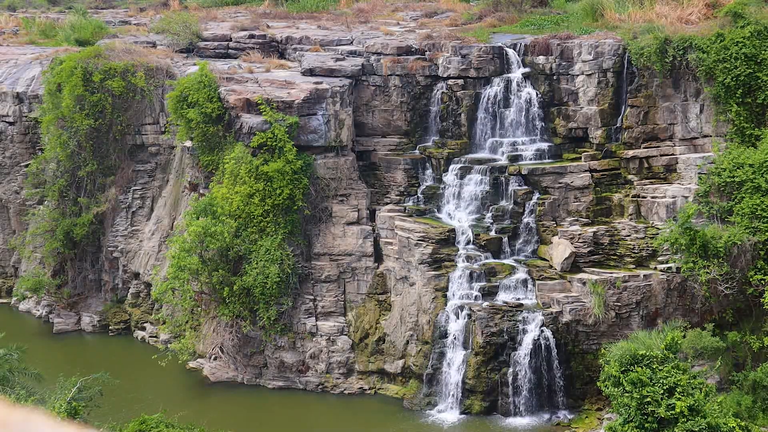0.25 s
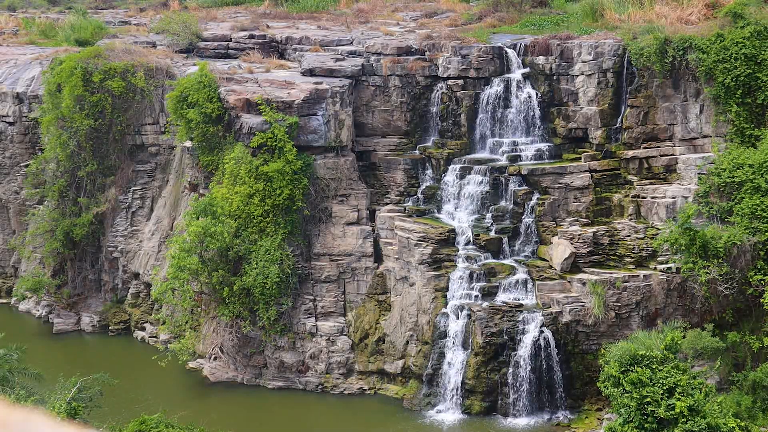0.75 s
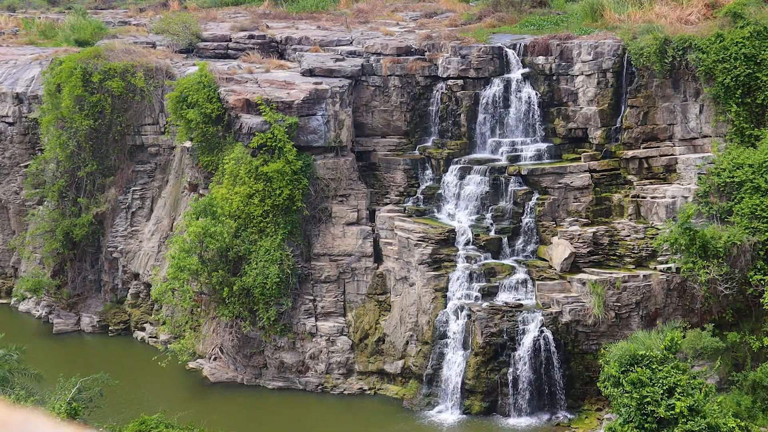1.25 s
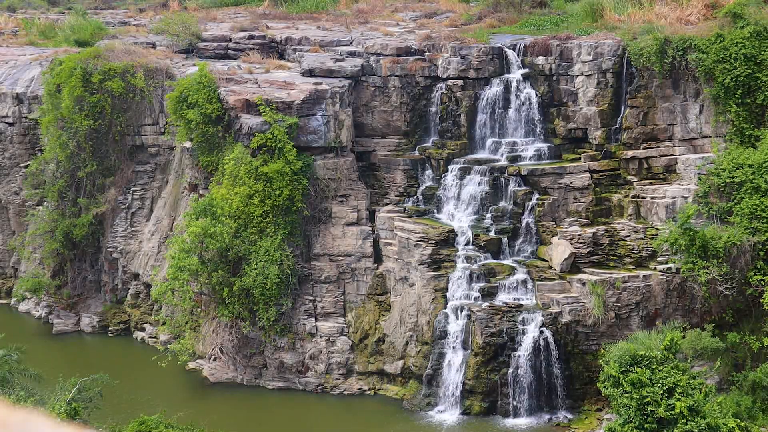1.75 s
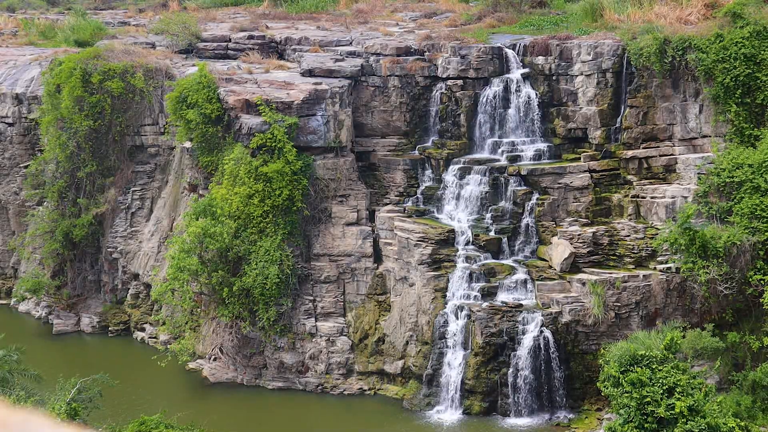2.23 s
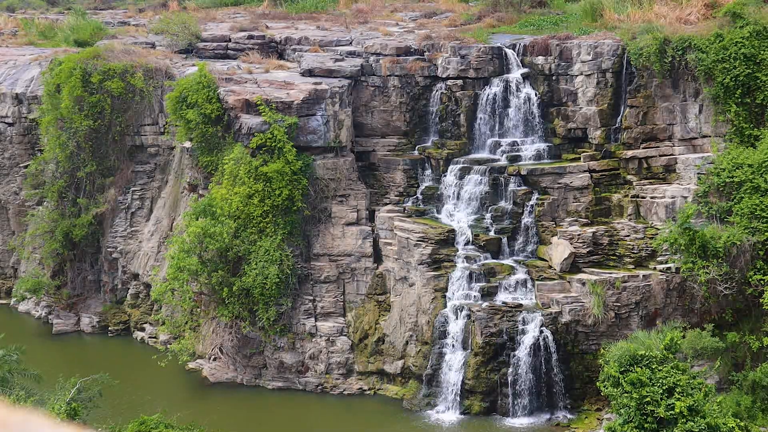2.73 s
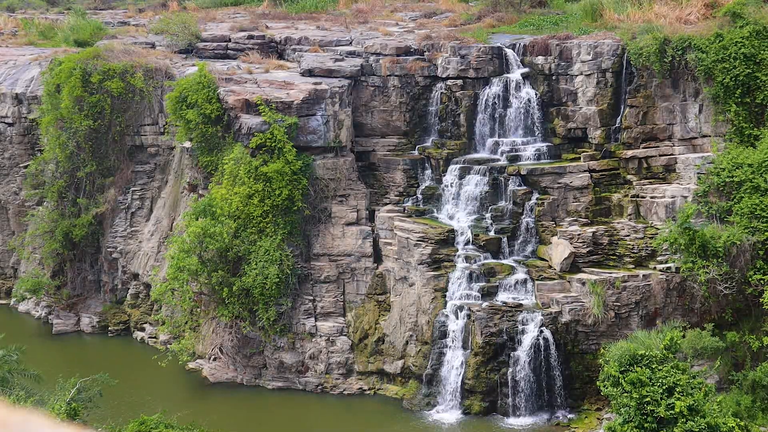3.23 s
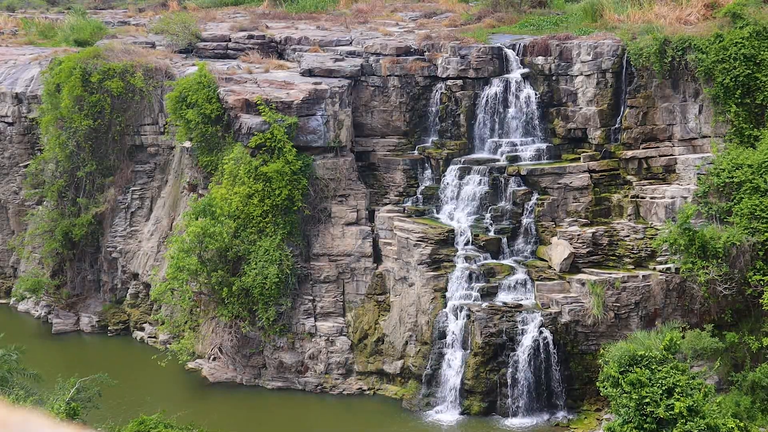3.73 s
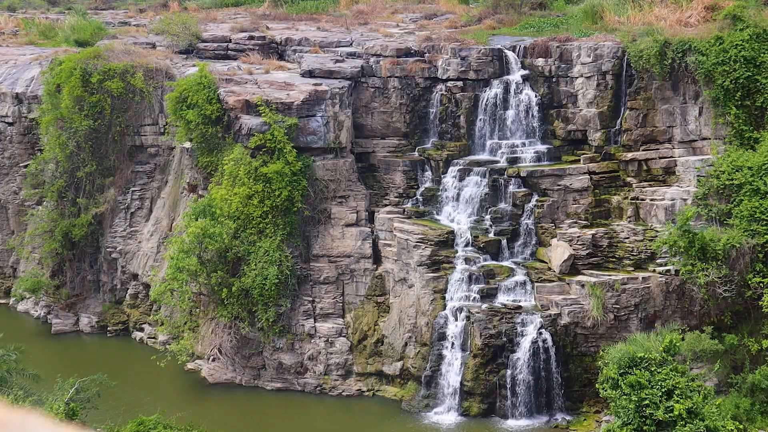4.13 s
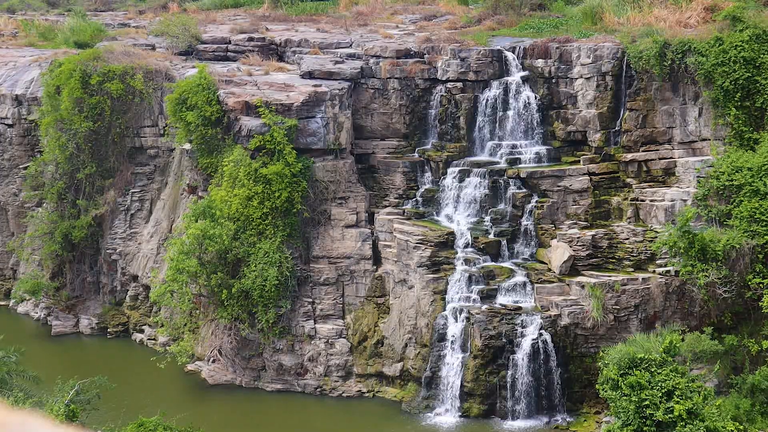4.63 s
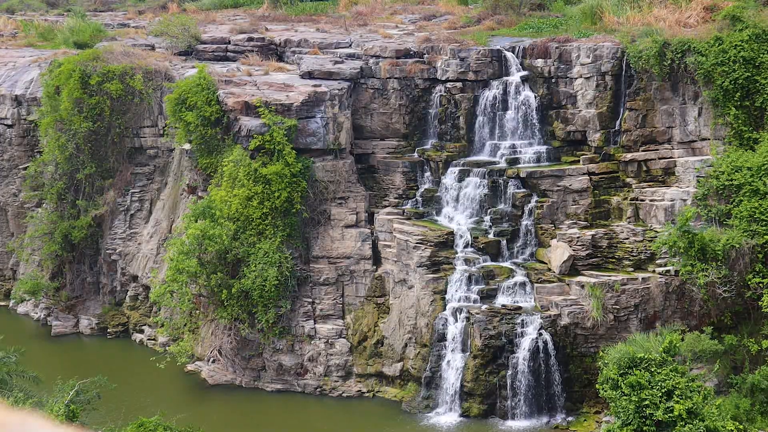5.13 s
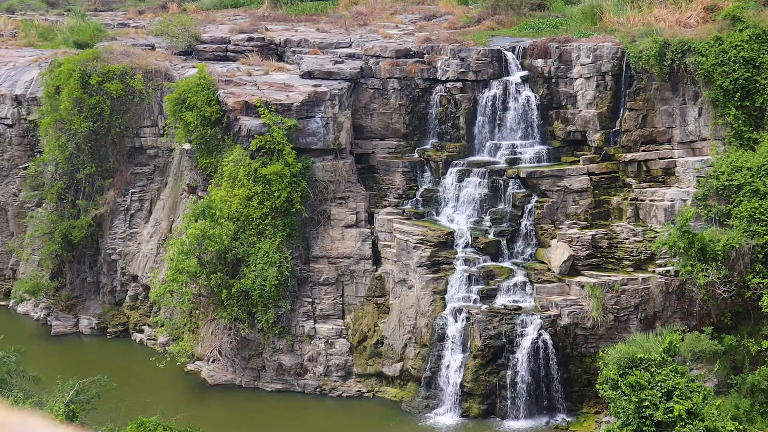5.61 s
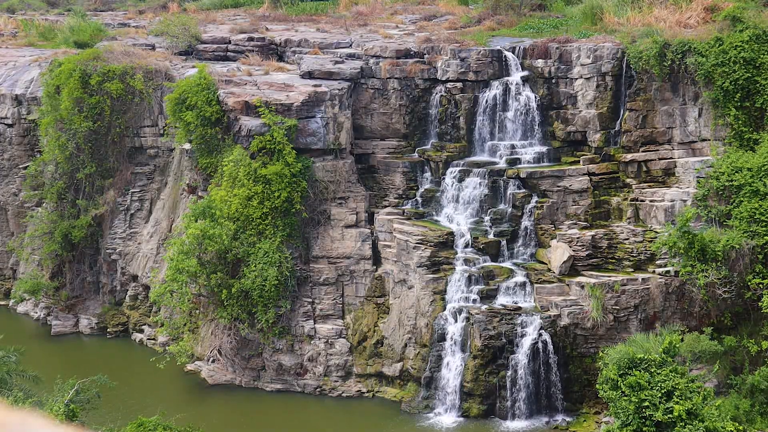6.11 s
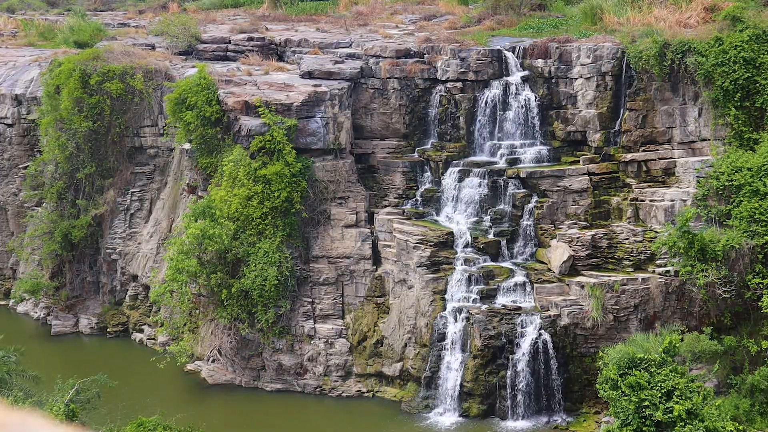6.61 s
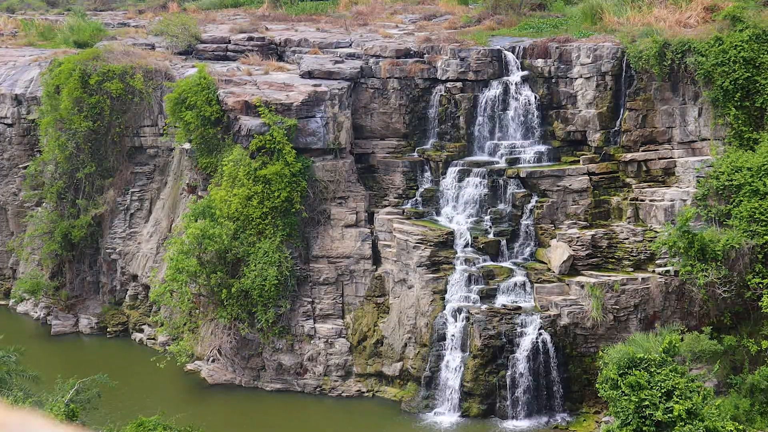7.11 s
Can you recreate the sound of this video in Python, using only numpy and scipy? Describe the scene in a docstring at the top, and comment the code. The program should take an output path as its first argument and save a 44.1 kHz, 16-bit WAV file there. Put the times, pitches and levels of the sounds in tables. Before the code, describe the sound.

A waterfall's rush fades away and partly returns while a near songbird sings ticks, swoops and a buzz, answered by a trill on the left.

```python
"""A waterfall of shaped noise rushes, fades away to a quiet wood of softer noise and comes partly back.
Birds sing in gliding sine tones: far ones to the right pipe, whistle and chatter; a near songbird runs
through ticks, swoops, hops and a buzzy flourish; one to the left answers with a trill of falling sweeps.
The trees scatter every note in sparse echoes, leaves rustle, and short round plops stand out of the rush.
A wide high hiss, perhaps insects, fades and returns with the water."""
import sys
import numpy as np
from scipy import signal
from scipy.io import wavfile
from scipy.ndimage import uniform_filter1d

SR = 44100
rng = np.random.default_rng(int(sys.argv[2]) if len(sys.argv) > 2 else 0)


def unload_audio(sound):
    """Save the sound as a 16-bit wav file, at the path given as the first command line argument."""
    columns = np.transpose(np.atleast_2d(sound))
    # keep every value between -1 and 1, then stretch to whole-number steps
    steps = np.round(np.clip(columns, -1, 1) * 32767)
    wavfile.write(sys.argv[1], SR, steps.astype(np.int16))


def attenuation_scalar(level_db):
    """Turn a level in dB into a linear amplitude multiplier (20 dB per decade)."""
    decades = np.asarray(level_db, float) / 20
    return 10 ** decades


N = 324576  # length in samples


def evened(x):
    """Scales a signal to an rms of 1."""
    return x / np.sqrt(np.mean(x ** 2) + 1e-20)


def read(points, hz):
    """Reads a curve between its points on a log-frequency axis."""
    f, value = np.transpose(points)
    return np.interp(np.log(hz + 1), np.log(f + 1), value)


def noise(spectrum, likeness, patchy_db):
    """Noise from random short-time spectra with drifting loud patches, in two partly alike channels."""
    hz = np.fft.rfftfreq(1024, 1 / SR)
    a, b, c, d, patches = rng.standard_normal((N // 256 + 5, 513, 5)).T
    patches = uniform_filter1d(patches, size=12, axis=0)  # over frequency
    patches = evened(uniform_filter1d(patches, size=10, axis=1))  # over time
    same = np.clip(read(likeness, hz), -1, 1)[:, None]
    left = a + 1j * b
    right = same * left + np.sqrt(1 - same ** 2) * (c + 1j * d)
    shaped = np.array([left, right]) * attenuation_scalar(read(spectrum, hz)[:, None] + patchy_db * patches)
    return evened(signal.istft(shaped, nperseg=1024, noverlap=768)[1][:, :N])


# tone colour of the falling water: f/Hz, relative level/dB (per Hz)
RUSH = [(15, -50), (25, -25), (78, -7.5), (241, -3), (678, -1.5), (1060, -2.5), (1860, -8.5), (2690, -10),
        (3530, -13.5), (3800, -18.5), (4190, -16), (9000, -29.5), (11700, -62), (19800, -120)]
# how alike the rush is in both ears: f/Hz, likeness (1 = the same)
RUSH_LIKENESS = [(30, .995), (70, .9993), (250, .9993), (400, .97), (700, .96), (1300, .82), (2400, .5),
                 (4400, .4), (8000, .1)]
# tone colour of the high hiss, perhaps insects: f/Hz, relative level/dB (per Hz)
HIGH_HISS = [(4120, -39), (7000, -5), (9330, -7.5), (12000, -4), (13300, -5.5), (15300, -10), (16100, -13),
             (16300, -30)]
# slow drift, which the fade then scales: t/s, rumble against the rush level/dB, high hiss level/dB
DRIFT = [(0, 1, -49.5), (1.6, 3, -47), (2.5, -0.5, -45), (3.6, -2.5, -48.5), (5.8, 3, -47.5),
         (7.36, 5, -44)]


def waterfall():
    """Falling water as a rush with its low rumble, and a wide high hiss, perhaps insects, under one fade."""
    t = np.arange(N) / SR
    gone_s, back_s, return_s = 4.326, 5.56, 4.69  # silent, heard again, time a full return would take
    fade = np.maximum(0, np.maximum(1 - t / gone_s, (t - back_s) / return_s))
    s, *columns = np.transpose(DRIFT)
    rumble_db, hiss_db = (np.interp(t, s, c) for c in columns)
    rush = noise(RUSH, RUSH_LIKENESS, patchy_db=1.43)
    low_pass = signal.firwin(1001, 260, fs=SR)[None]
    rumble = signal.oaconvolve(rush, low_pass, "same")
    rush = attenuation_scalar(-33.5) * (rush - rumble + attenuation_scalar(rumble_db) * rumble)
    hiss = attenuation_scalar(hiss_db) * noise(HIGH_HISS, [(7000, 0.041), (16000, .05)], patchy_db=2.0)
    return fade * (rush + hiss)


def add(mix, s, sound):
    """Mixes a two-channel sound in at a time in seconds."""
    part = mix[:, round(s * SR):][:, :sound.shape[1]]
    part += sound[:, :part.shape[1]]


# tone colour of leaves and distant air: f/Hz, relative level/dB
WOOD = [(59, -74), (100, -87), (235, -12.5), (474, -3.5), (667, -6), (938, -10), (1020, -9.5),
        (1470, -13.5), (3230, -8.5), (5170, -17), (13800, -29.5), (16300, -31)]
# short rustles in the leaves: t/s, length/s, level/dB (before the filter and the soft edges)
RUSTLES = [(3.54, 0.044, -49.5), (4.37, 0.11, -60), (5.017, .03, -59), (5.277, 0.074, -53.5),
           (5.391, 0.099, -50)]


def wood():
    """Leaves and distant air as a quiet floor of noise, with brief bright bursts for rustles."""
    out = attenuation_scalar(-53.5) * noise(WOOD, [(200, 0.54), (2000, 0.21), (15000, .1)], patchy_db=2.0)
    band = signal.butter(2, [4000, 13000], "bandpass", fs=SR, output="sos")
    for s, length, db in RUSTLES:
        bright = signal.sosfilt(band, rng.standard_normal((2, 6000)))[:, :round(length * SR)]
        add(out, s, attenuation_scalar(db) * bright * signal.windows.tukey(bright.shape[1], .6))
    return out


def whistle(hz, db, pan_db, waver=0.0078):
    """A sine from the bird's voice organ (syrinx), its swells rounded, pitch and level trembling a little."""
    tremble = evened(uniform_filter1d(rng.standard_normal((2, len(hz))), size=130))
    size = uniform_filter1d(attenuation_scalar(db + 1.62 * tremble[0]), size=45)
    turn = 2 * np.pi * np.cumsum(hz * (1 + waver * tremble[1])) / SR
    # a faint overtone, growing with effort, that a high throat resonance lets out
    third = attenuation_scalar(db - 12 - 10 * ((3 * hz - 12800) / 700) ** 2)
    pan = attenuation_scalar(np.array([[pan_db / 2], [-pan_db / 2]]))  # above 0 is to the left
    return np.sqrt(2) * size * (np.sin(turn) + third * np.sin(3 * turn)) * pan


def shake(count, per_s):
    """A fast, slightly uneven up-and-down for the pitch, and its unevenness."""
    uneven = evened(uniform_filter1d(rng.standard_normal(count), size=300))
    return np.sin(2 * np.pi * np.cumsum(per_s * (1 + 0.122 * uneven)) / SR), uneven


def syllables(song, pan_db, **voice):
    """Sings each syllable shape, note by note as gliding whistles, at its times."""
    out = np.zeros((2, N))
    edge_ms, edge_db = 2.5, -21  # each note swells quickly from near silence and sinks back to it
    for shape, rows in song:
        for note in shape:
            ms, hz, db = np.transpose(note)
            t = np.arange(ms[0] - edge_ms, ms[-1] + edge_ms, 1000 / SR)
            outside = np.maximum(0, np.maximum(ms[0] - t, t - ms[-1]) / edge_ms)
            note_hz = np.interp(t, ms, hz)
            note_db = edge_db * outside + np.interp(t, ms, db)
            for s, level_db, pitch in rows:
                add(out, s + t[0] / 1000, whistle(pitch * note_hz, level_db + note_db, pan_db, **voice))
    return out


def echoes(scatter_db, tail_db, tail_t60, alike):
    """Sparse echoes: quick scatter from near branches, then a long tail from the wood and rock."""
    at = np.arange(40, SR - 20, 20) + rng.integers(0, 20, (3, (SR - 41) // 20))
    sign, t = rng.choice([-1., 1.], at.shape), at / SR
    arrival = 1 - np.exp(-(t / 0.0015) ** 2)  # the echoes build up in a few ms
    scatter = arrival * attenuation_scalar(-60 * t / 0.12)  # falls 60 dB in 0.12 s
    tail = arrival * attenuation_scalar(-60 * t / tail_t60)  # falls 60 dB in tail_t60 seconds
    size = attenuation_scalar(scatter_db) * scatter / np.linalg.norm(scatter[0])
    size = size + attenuation_scalar(tail_db) * tail / np.linalg.norm(tail[0])
    taps = np.zeros((3, SR))
    np.put_along_axis(taps, at, sign * size, 1)
    alike = np.clip(alike, 0, 1)  # share of echo energy that both ears get
    return np.sqrt(alike) * taps[2] + np.sqrt(1 - alike) * taps[:2]


def trees(x, hidden=0, screen_db=0, **wood):
    """Direct sound plus three echo patterns taking turns, as birds turn their heads and leaves stir.
    Leaves weaken the direct part of the hidden sound by screen_db, but not its echoes."""
    turn = 2 * np.pi * 1.7 * np.arange(N) / SR
    wet = 0
    for k in range(3):
        share = np.sqrt(2 / 3) * np.cos(turn + k * np.pi / 3)
        wet = wet + signal.fftconvolve((x + hidden) * share, echoes(**wood), axes=1)[:, :N]
    return x + attenuation_scalar(screen_db) * hidden + wet


# a pure piped syllable, one list for each note: t/ms (within the syllable), f/Hz, relative level/dB
PIPE = [
    [(3.983, 3930, -13), (25, 3925, 0.5), (55, 3920, 1.5), (84, 3915, -2.5)],
    [(99.8, 3910, -3.5), (118, 3905, -7), (147, 3900, -19)],
]
# when it is piped: t/s, level/dB, pitch factor
PIPING = [(0.022, -33.5, 0.99), (0.513, -34, 1), (1.044, -34.5, .988)]
# single pure glides, some level and some falling, hardly shaken:
# t/s, length/s, first f/Hz, last f/Hz, level/dB (before panning and soft edges)
PEEPS = [(1.28, 0.0357, 9430, 9040, -43), (1.614, .03, 9540, 9000, -49), (2.021, .031, 10100, 8400, -42),
         (4.726, .11, 7180, 7450, -51), (4.885, 0.13, 6900, 6700, -54), (3.52, .015, 4230, 4080, -49),
         (3.555, 0.026, 4040, 3980, -50.5), (5.19, 0.086, 2316, 2255, -57),
         (5.325, .045, 2300, 2314, -58.5), (5.438, .04, 1800, 1802, -51.5), (5.54, 0.144, 1830, 1810, -66),
         (6.242, 0.109, 2336, 2282, -57.5), (6.285, 0.027, 4650, 4650, -70),
         (6.417, 0.026, 4680, 4610, -59), (6.555, 0.028, 4500, 4640, -56)]
# the same columns, lightly shaken: t/s, length/s, first f/Hz, last f/Hz, level/dB
WARBLES = [(.1, 0.13, 3270, 2520, -47), (.225, 0.092, 5280, 4410, -36.5), (.385, 0.096, 3020, 3375, -44.5),
           (.749, .12, 4900, 4346, -40), (5.025, .07, 4250, 4340, -47), (5.085, 0.023, 4130, 3930, -45.5),
           (5.095, .12, 3595, 3200, -43), (5.407, 0.011, 4780, 3750, -40.5), (5.748, .03, 2550, 2600, -54),
           (7.335, 0.019, 3770, 5460, -44.5)]
# the same columns, harshly shaken: t/s, length/s, first f/Hz, last f/Hz, level/dB
CHATTER = [(4.373, 0.042, 4800, 4840, -41), (4.517, .06, 6960, 7200, -60), (4.56, .095, 6450, 6180, -51),
           (5.364, .018, 4750, 4610, -50), (5.454, 0.076, 2950, 3750, -41.5),
           (5.531, 0.017, 3490, 3020, -43.5), (5.556, .021, 3130, 4040, -42),
           (5.605, 0.018, 4300, 3990, -40.5), (5.651, .02, 4260, 4080, -51), (5.704, .008, 4060, 4400, -44),
           (5.711, 0.022, 3130, 3150, -52), (5.747, .009, 4200, 3950, -45.5),
           (5.758, 0.055, 3100, 3210, -49), (5.811, 0.051, 2970, 3345, -48),
           (5.866, 0.064, 3000, 2700, -55.5)]


def far_birds():
    """Pure piping, and single glides that bend early and settle, some shaken into a chatter."""
    out = syllables([(PIPE, PIPING)], pan_db=-5.0, waver=0.0018)
    swing, uneven = shake(count=N, per_s=130)
    for notes, depth_hz in (PEEPS, 9.5), (WARBLES, 116), (CHATTER, 204):
        for s, length, first_hz, last_hz, db in notes:
            u = np.linspace(0, 1, max(round(length * SR), 50))
            now = np.minimum(round(s * SR) + np.arange(len(u)), N - 1)
            glide = last_hz + (first_hz - last_hz) * (1 - u) ** 2.4
            hz = glide + depth_hz * (swing[now] + 0.413 * uneven[now])
            soft_edges = signal.windows.tukey(len(u), .6)
            add(out, s, whistle(hz, db, pan_db=-5.5, waver=0.0034) * soft_edges)
    return trees(out, scatter_db=-10.0, tail_db=-2.5, tail_t60=0.9, alike=0.34)


def songbird(song, buzz, shakes_per_s, depth, pan_db):
    """The syllables, and a flourish at its own time that buzzes because its pitch is shaken fast."""
    out = syllables(song, pan_db)
    s, *columns = np.transpose(buzz)
    t = np.arange(s[0], s[-1], 1 / SR)
    hz, db = (np.interp(t, s, c) for c in columns)
    swing, uneven = shake(count=len(t), per_s=shakes_per_s)
    shaken_hz = hz + depth * (hz - 1000) * swing  # depth is a share of the pitch above 1000 Hz
    add(out, s[0], whistle(shaken_hz, db + 0.42 * uneven, pan_db))
    return out


# the near bird's syllables, one list for each note: t/ms (from the syllable's time), f/Hz, relative level/dB
TICK = [
    [(1.5, 6550, 2), (4, 6300, 0), (6, 5600, -18), (12, 4200, -17)],
    [(17, 6250, -10), (20, 6150, -11), (23, 5250, -13), (33, 5250, -11), (38, 3850, -12)],
    [(39, 4200, -16), (42, 6300, -1), (44, 6650, 0), (47, 7300, -13), (60, 7880, -15)],
]
SWOOP = [
    [(1, 6600, -12.5), (5, 4100, -5)],
    [(11, 5300, -10), (15.3, 5000, -1), (20.8, 4850, -6), (27.2, 4730, -14)],
    [(45.9, 5350, -7.5), (52.1, 4290, 0.5), (62.2, 3700, -4.5), (72.3, 3100, -11), (77.7, 3650, -10),
     (85.1, 3950, 0.5), (98.5, 4440, -4.5), (102.9, 5660, -5.5), (110.4, 5860, -14.5)],
]
HOP = [
    [(1, 3520, -8), (8, 3560, -6), (12, 3450, -14), (15, 4200, -4), (18, 5350, -4), (25, 4150, -1),
     (32, 3400, -10)],
    [(38, 3200, -2), (42, 3130, -1), (46, 2900, -10), (61, 2100, -24)],
]
FLICK = [
    [(1.5, 7300, -6.5), (4, 6200, -5.5), (7, 3100, -6)],
]
PEAK = [
    [(0, 2200, -22), (8, 2950, -12), (13, 3130, -3), (16, 3190, 0), (22, 3320, -4)],
    [(28, 3650, -6), (36, 4000, -1), (41, 4600, -5), (44, 3850, -4), (48, 3140, -4), (56, 2650, -12),
     (66, 2050, -21)],
]
# its soft opening from behind leaves: syllable and its rows of t/s, level/dB, pitch factor
NEAR_OPENING = [(TICK, [(1.102, -44, 1.0), (1.208, -32, 1.0), (1.314, -28, 1.0), (1.420, -25.5, 0.99),
                (1.525, -23.5, 0.99)])]
# its open song: syllable and its rows of t/s, level/dB, pitch factor
NEAR_SONG = [ (SWOOP, [(1.632, -18, 1.04), (1.798, -16, 1), (1.967, -15.5, 0.99), (2.138, -15, 0.98)]),
             (HOP, [(2.300, -18.5, 0.96), (2.391, -18, 0.94), (2.482, -17, 0.95), (2.574, -17.5, 0.93),
             (2.667, -18.5, 0.95)]), (FLICK, [(2.798, -22.5, 0.92)]), (PEAK, [(2.838, -15.5, 0.98)])]
# its buzzy flourish: t/s, centre f/Hz, level/dB
NEAR_BUZZ = [(2.966, 5040, -53), (2.979, 4986, -23), (2.999, 5000, -21.5), (3.048, 4864, -23),
             (3.082, 3250, -21), (3.105, 2614, -29), (3.13, 2297, -35), (3.2, 2080, -42.5)]


def near_songbird():
    """Gliding whistles from close by: soft ticks behind leaves, swoops, hops and a shaken flourish."""
    pan_db = 0.7
    song = songbird(NEAR_SONG, NEAR_BUZZ, shakes_per_s=210, depth=.12, pan_db=pan_db)
    opening = syllables(NEAR_OPENING, pan_db, waver=0.008)
    return trees(song, opening, screen_db=-3, scatter_db=-8, tail_db=-3.5, tail_t60=0.72, alike=0.61)


# single plops standing out of the rush: t/s, f/Hz, level/dB (before the rounding)
PLOPS = [(2.152, 1283, -35), (2.24, 1800, -43), (2.37, 1413, -41), (2.52, 940, -37), (2.66, 1430, -42)]


def plops():
    """Short rounded sine tones, as from bubbles closing in a pool."""
    length_s = 0.023
    out, t = np.zeros((2, N)), np.arange(0, length_s, 1 / SR)
    rounding = np.sin(np.pi * t / length_s)
    for s, hz, db in PLOPS:
        tone = np.sqrt(2) * attenuation_scalar(db) * np.sin(2 * np.pi * hz * t)
        add(out, s, tone * rounding * np.ones((2, 1)))
    return out


# the left bird's syllables, one list for each note: t/ms (from the syllable's time), f/Hz, relative level/dB
PAIR = [
    [(0, 4400, -18), (3, 5300, -4), (12, 5270, 0), (27, 5200, -5)],
    [(32, 8100, -20), (37, 7250, -16), (41, 7050, -12), (49, 7000, -14)],
    [(42, 6500, -13), (45, 6080, -2), (51, 6020, 0), (64, 5960, -7)],
]
KNEE = [
    [(2, 3500, -15), (6, 3830, -6), (18, 3960, 0), (26, 4020, -3), (34, 3880, -1), (42, 3350, -2),
     (52, 2450, -8)],
]
SWEEP = [
    [(-11, 5550, -18.5), (-2.5, 6640, -26)],
    [(0, 4650, -7.5), (10, 3780, 1), (20.24, 3250, -3.5), (29.84, 2780, -5), (46.9, 1940, -21)],
]
RISE = [
    [(-30, 4700, -16), (-20, 3950, -8), (-14, 3650, -4)],
    [(0, 2950, -2), (15, 3150, 0), (32, 3450, -3), (42, 3950, -5), (50, 5000, -22)],
]
# its soft calls from behind leaves: syllable and its rows of t/s, level/dB, pitch factor
LEFT_CALLS = [(PAIR, [(3.248, -51, 1.02), (3.344, -47.5, 1.015), (3.442, -45, .99), (3.538, -45, .975),
              (3.634, -43.5, .965), (3.731, -44.5, .96), (7.152, -54.5, 1.035), (7.25, -50, 1.025),
              (7.338, -55, 1.02)])]
# its open song: syllable and its rows of t/s, level/dB, pitch factor
LEFT_SONG = [ (KNEE, [(3.830, -31.5, 1.0)]), (SWEEP, [(4.100, -28, 1.0), (4.192, -27, 0.98),
             (4.288, -27, 0.97), (4.381, -26.5, 0.95), (4.476, -27, 0.95), (4.574, -28, 0.96),
             (4.675, -28, 0.96), (4.775, -30, 0.92)]), (RISE, [(6.700, -50, 1.05), (6.865, -47.5, 1.03),
             (7.030, -46.5, 0.98), (7.195, -46.5, 1.03)])]
# its buzzy flourish: t/s, centre f/Hz, level/dB
LEFT_BUZZ = [(3.882, 2350, -44), (3.893, 2600, -37), (3.94, 3650, -35), (3.975, 4300, -35),
             (4.01, 4600, -37), (4.07, 4500, -40), (4.098, 4500, -52)]


def left_songbird():
    """Gliding whistles from the left: soft pairs behind leaves, a short buzz and a trill of falling sweeps."""
    pan_db = 5.0
    song = songbird(LEFT_SONG, LEFT_BUZZ, shakes_per_s=170, depth=0.083, pan_db=pan_db)
    calls = syllables(LEFT_CALLS, pan_db, waver=0.017)
    return trees(song, calls, screen_db=-6, scatter_db=-1, tail_db=0.0, tail_t60=1.0, alike=0.51)


def scene():
    """Water and wood, with the birds heard through the trees."""
    return waterfall() + wood() + far_birds() + near_songbird() + plops() + left_songbird()


def top_cut(x):
    """Nothing passes above the cut-off."""
    return signal.sosfilt(signal.butter(12, 15800, fs=SR, output="sos"), x)


def record(dry):
    """Passes on the finished mix."""
    return top_cut(dry)


dry = scene()
out = record(dry)
unload_audio(out)
```